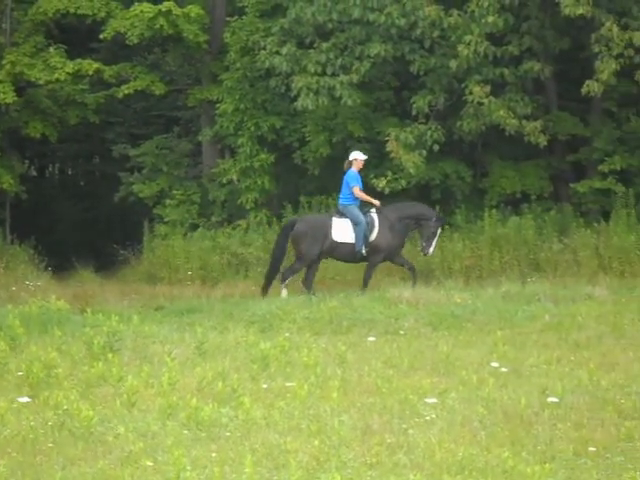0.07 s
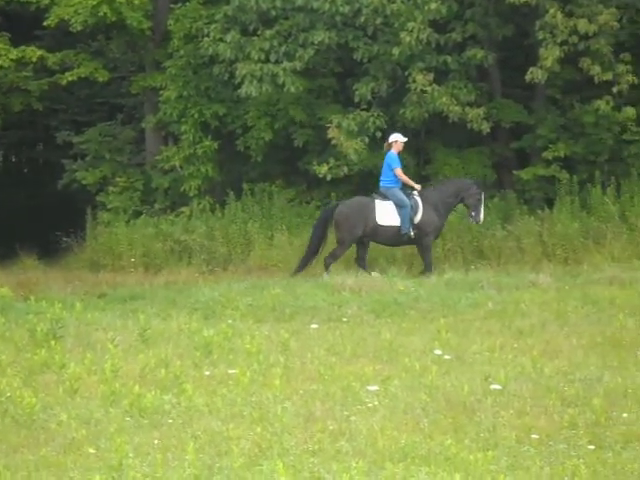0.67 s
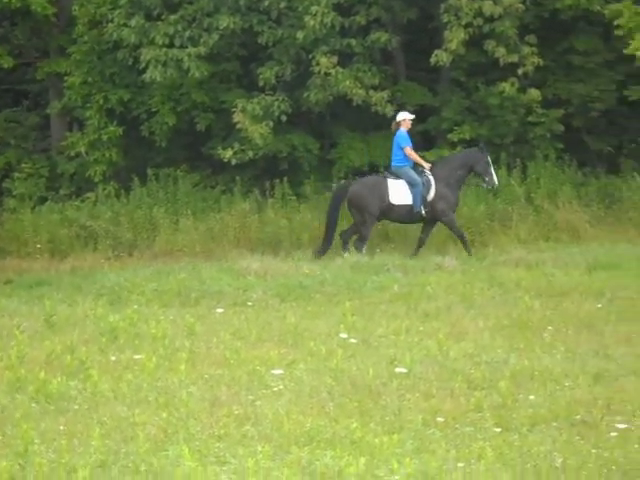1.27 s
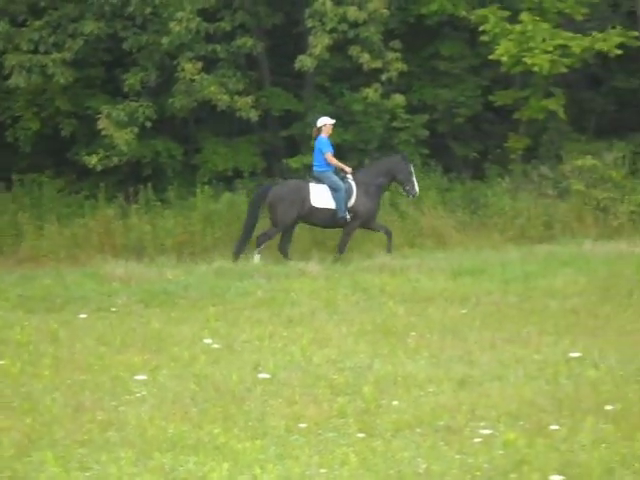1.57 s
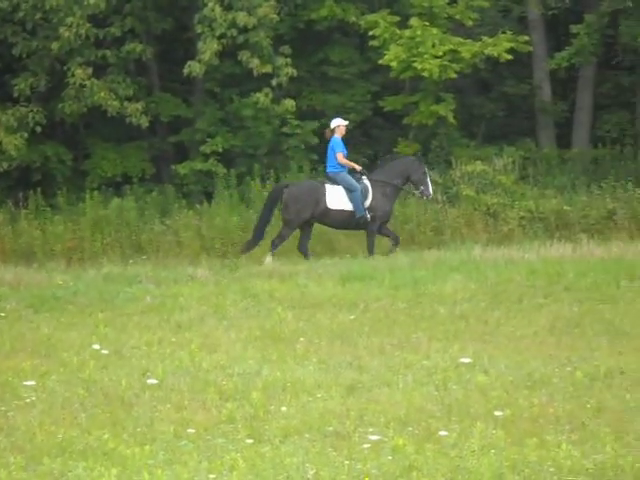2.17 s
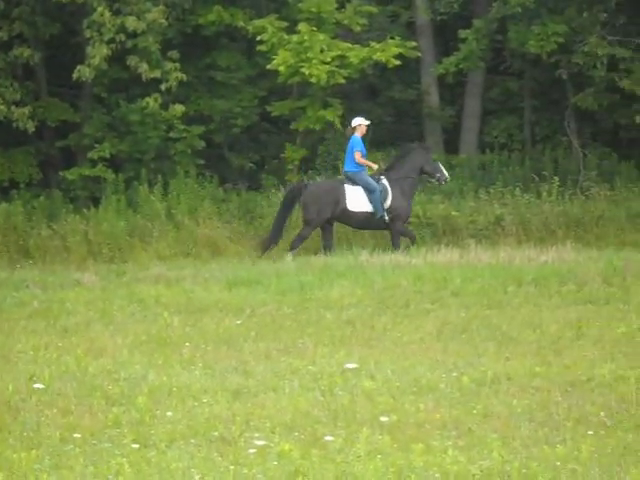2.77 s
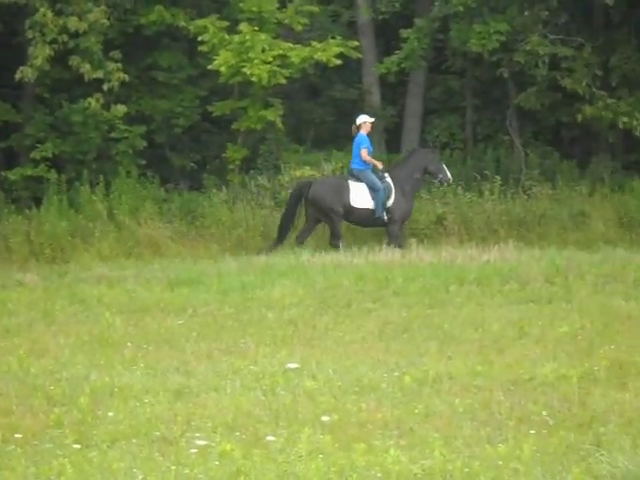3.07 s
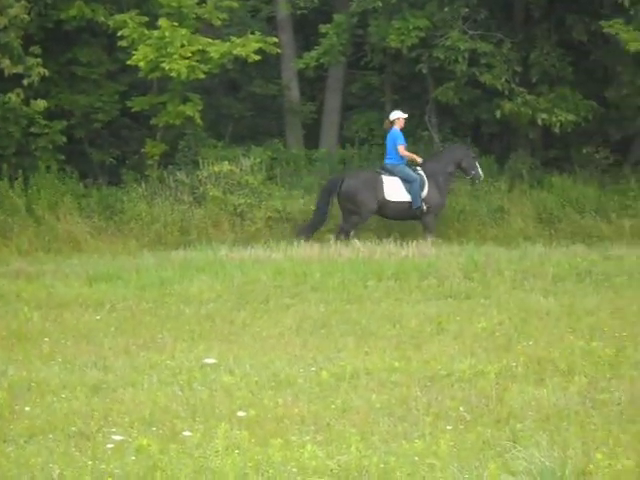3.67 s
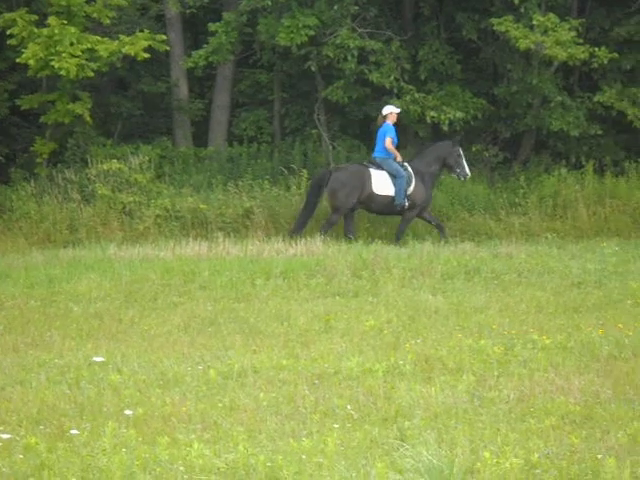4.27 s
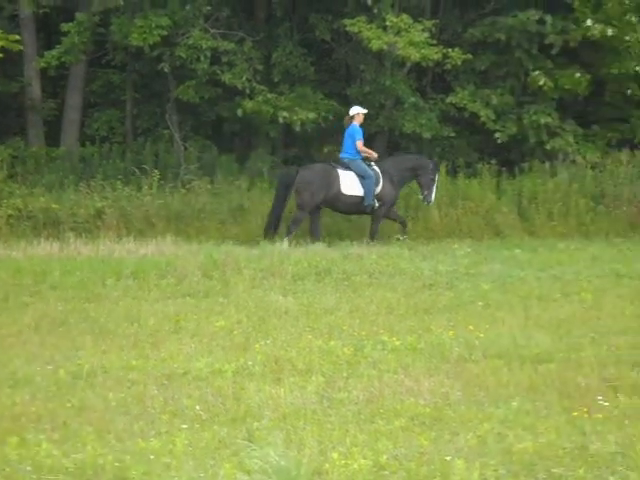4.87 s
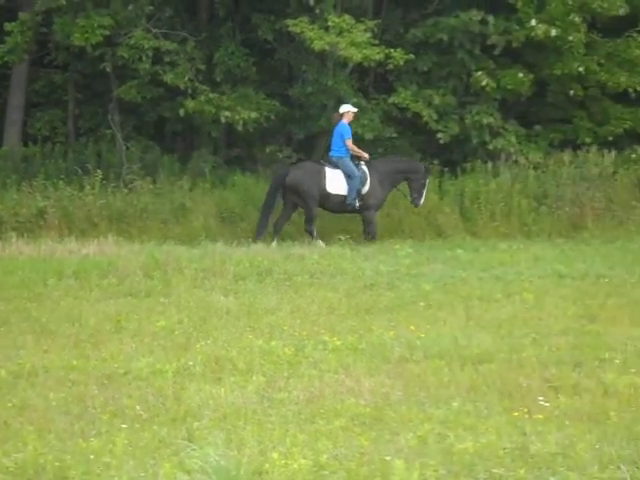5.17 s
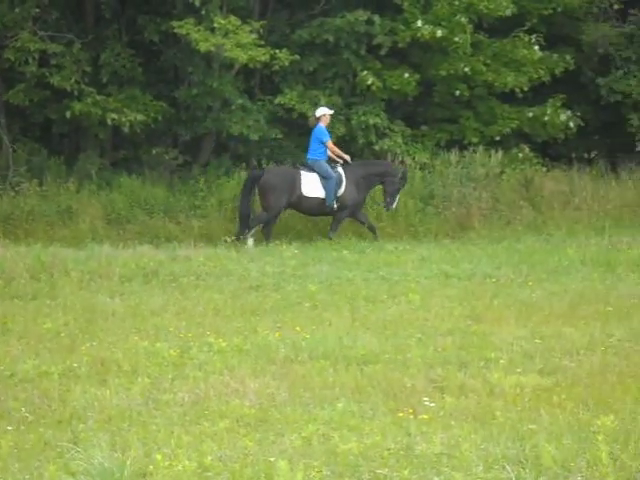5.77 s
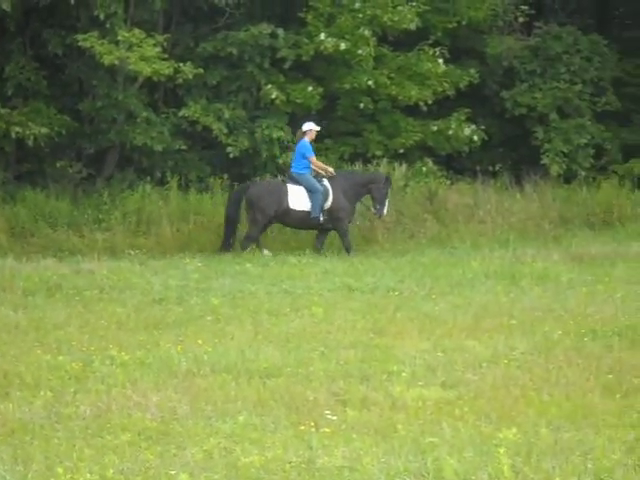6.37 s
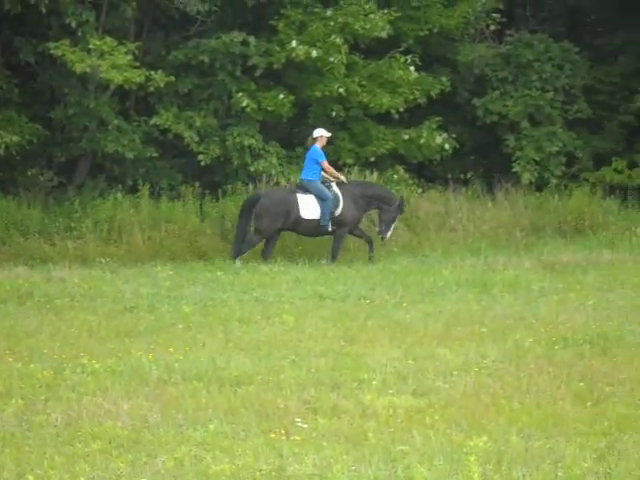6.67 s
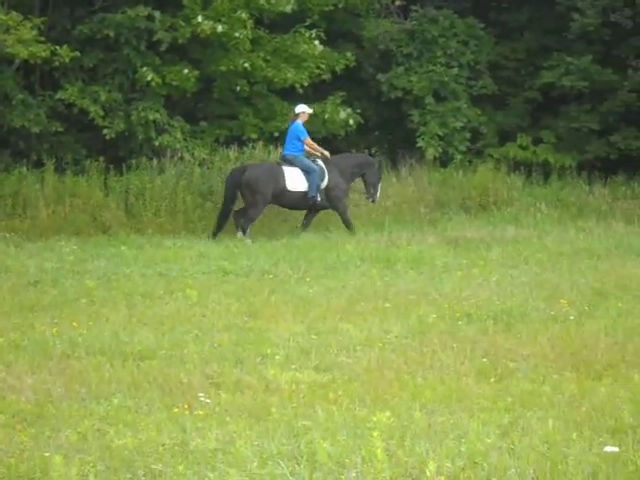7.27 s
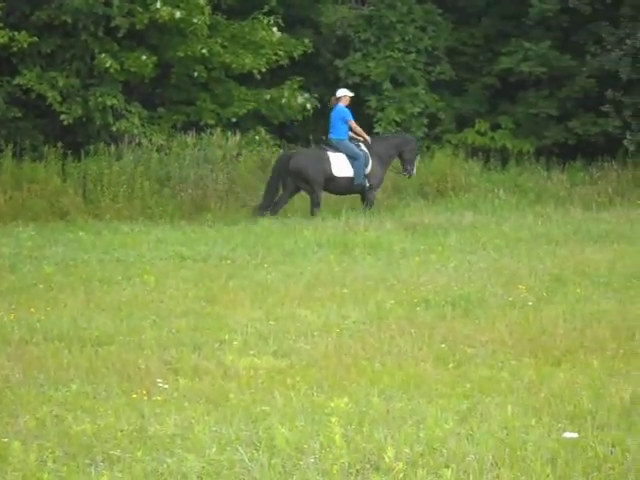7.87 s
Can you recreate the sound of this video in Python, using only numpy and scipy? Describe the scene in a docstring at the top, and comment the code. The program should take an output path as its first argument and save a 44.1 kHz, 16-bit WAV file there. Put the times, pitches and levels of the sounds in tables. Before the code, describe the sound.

A steady, faint hiss runs for the whole eight seconds, a mix of a small camera's microphone noise and the smooth wash of trees around an open field. It barely wavers and sounds dull, with little treble. Under it lies a light, lumpy wind rumble on the microphone, swelling slightly in the first second. At about 1.2 seconds comes one sharp, very short plastic click right at the microphone, by far the loudest sound and slightly distorted. The hiss drops at once, partly recovers within half a second, stays a little lower until about 3.5 seconds, then creeps back by around 6 seconds. The breeze builds gently from about 4.5 seconds. Several soft, low wind buffets bump the microphone between 5.7 and 6.3 seconds, and a quicker cluster follows from 7.6 seconds to the end as the rumble rises.

```python
"""Steady hiss of a small camera's microphone, with the wash of trees, in an open field.
Light wind rumbles on the microphone and buffets it towards the end. One sharp click close by,
likely the camera's plastic case, overloads the recorder: its gain control drops the hiss,
holds it down and slowly lets it return."""
import sys
import numpy as np
from scipy import signal
from scipy.fft import rfft, irfft, next_fast_len
from scipy.io import wavfile
from scipy.ndimage import minimum_filter1d

SR = 44100
rng = np.random.default_rng(int(sys.argv[2]) if len(sys.argv) > 2 else 0)


def wav_out(sig):
    """Save sig, one row per channel (or a flat mono array), as 16-bit PCM at SR to the path in sys.argv[1]."""
    wavfile.write(sys.argv[1], SR, np.round(np.clip(np.atleast_2d(sig).T, -1, 1) * 32767).astype(np.int16))


N = 358091
TIME = np.arange(N) / SR


def hiss(level_db=-38, waver_db=0.39):
    """Microphone hiss and wash of trees: smooth noise that barely wavers."""
    # (frequency [Hz], relative density [dB])
    spectrum = [(20, -2.5), (90, -2), (150, -2), (220, -2), (290, -0.6), (420, -1.3), (600, -0.74),
                (800, 0), (1100, -2.2), (1600, -3.5), (2300, -5), (3200, -6), (4500, -6.5)]
    return from_db(level_db + waver_db * drift(rate_hz=5.5)) * noise(spectrum)


def case_click(onset_s=1.19647, gain_db=1.2, rise_cycles=3.61, tail_db=-25, tail_t60_s=.09):
    """The plastic case rings for a few milliseconds and leaves a faint diffuse tail."""
    # (frequency [Hz], level [dB], t60 [s])
    modes = [(650, 15.5, 0.0058), (1076, -7, .014), (1640, 18, .0025), (1950, -4, .0175),
             (2533, 6.5, .0111), (2671, 5, .0091), (3570, -9, .018), (3813, 2, .008), (4133, -5.5, .017)]
    # (frequency [Hz], relative density [dB])
    tail_spectrum = [(200, -8), (700, -7), (1500, -2.5), (2800, -3.5), (5000, -6), (8000, -41)]
    age_s = np.maximum(TIME - onset_s, 0)
    ring = np.zeros(N)
    for hz, mode_db, t60_s in modes:
        swell = 1 - np.exp(-(hz * age_s / rise_cycles) ** 2)  # high modes speak first
        ring += swell * from_db(mode_db - 60 * age_s / t60_s) * np.sin(2 * np.pi * hz * age_s)
    tail = (age_s > 0) * from_db(tail_db - 60 * age_s / tail_t60_s) * noise(tail_spectrum)
    return from_db(gain_db) * (ring + tail)


def buffets(half_width_cycles=1.08):
    """Each eddy rocks the diaphragm for a few slow cycles; deeper ones last longer."""
    # (time [s], peak level [dB], frequency [Hz])
    eddies = [(5.706, -34, 66), (5.843, -44, 80), (6.037, -30.5, 24), (6.222, -41, 95), (6.272, -39.5, 85),
              (7.599, -41.5, 100), (7.637, -36.5, 80), (7.708, -42, 68), (7.823, -37.5, 68),
              (7.903, -38.5, 85), (7.969, -40, 72)]
    rocking = np.zeros(N)
    for (crest_s, peak_db, hz), phase in zip(eddies, rng.random(len(eddies))):
        cycles = hz * (TIME - crest_s)
        envelope = from_db(peak_db) * np.exp(-(cycles / half_width_cycles) ** 2)
        rocking += envelope * np.cos(2 * np.pi * (cycles + phase))
    return rocking


def wind(breeze_db=-48.5, lumps_db=1.1):
    """Lumpy rumble of a steady breeze on the microphone, lifted by each gust."""
    # (frequency [Hz], relative density [dB])
    spectrum = [(4, -14.5), (12, 0), (28, 0.5), (45, -3.5), (70, -5.5), (100, -15), (150, -29.5),
                (300, -51.5), (1000, -93.5)]
    # (crest time [s], rise [dB], half width [s])
    gusts = [(0.3, 5, 0.15), (1.05, 3, 0.4), (5.45, 4, 1.15), (7.97, 8, 0.48)]
    gust_db = sum(rise_db * np.exp(-((TIME - crest_s) / half_s) ** 2)
                  for crest_s, rise_db, half_s in gusts)
    return from_db(breeze_db + gust_db + lumps_db * drift(rate_hz=12)) * noise(spectrum)


def from_db(db):
    """Decibels to gain."""
    return 10 ** (np.asarray(db) / 20)


def unit_rms(x):
    """Scales to rms 1."""
    return x / np.sqrt(np.mean(x ** 2) + 1e-20)


def colour(x, spectrum):
    """Filters by (frequency [Hz], gain [dB]) points joined on a log-frequency axis."""
    size = next_fast_len(N + 8192)
    hz, db = np.transpose(spectrum)
    bin_hz = np.fft.rfftfreq(size, 1 / SR)
    gain = from_db(np.interp(np.log(bin_hz + 1), np.log(hz + 1), db))
    return irfft(rfft(x, size) * gain, size)[..., :N]


def noise(spectrum):
    """Coloured noise, rms 1."""
    return unit_rms(colour(rng.standard_normal(N), spectrum))


def drift(rate_hz):
    """Slow random wander, rms 1, with rate_hz knots a second."""
    knots = rng.standard_normal(1024)
    return unit_rms(np.interp(TIME * rate_hz, np.arange(len(knots)), knots))


def release(db, tau_s):
    """Follows rises at once, falls back exponentially."""
    fade = np.exp(-TIME / tau_s)
    return np.maximum.accumulate(db / fade) * fade


def gain_control(x, threshold_db=-22, quick_share=.31, slow_share=.24, hold_s=2.38, attack_s=.01):
    """Peaks over the threshold cut the gain: one part recovers quickly, one holds, then creeps back."""
    over_db = np.maximum(20 * np.log10(abs(x).max(0) + 1e-9) - threshold_db, 0)
    half_hold = int(hold_s * SR / 2)
    # highest peak of the last hold_s
    held_db = -minimum_filter1d(-over_db, 2 * half_hold + 1, origin=half_hold, mode="constant")
    cut_db = quick_share * release(over_db, tau_s=.24) + slow_share * release(held_db, tau_s=1.1)
    pole = np.exp(-1 / (attack_s * SR))  # too slow to catch the first cycles
    return x * from_db(-signal.lfilter([1 - pole], [1, -pole], cut_db))


def scene():
    """All sources at one microphone."""
    return (hiss() + wind() + buffets() + case_click())[None]


def record(dry, full_scale=.72, cutoff_hz=16500):
    """Recorder: narrow band, gain control, clipping, low-pass."""
    # (frequency [Hz], gain [dB])
    passband = [(3650, 0), (3800, -2.5), (3910, -10), (4010, -18.5), (4200, -16), (4400, -29), (4600, -55),
                (4800, -100)]
    levelled = gain_control(colour(dry, passband))
    clipped = np.clip(levelled, -full_scale, full_scale)  # only clipping reaches the high treble
    low_pass = signal.firwin(511, cutoff_hz, window=("kaiser", 9), fs=SR)
    return signal.oaconvolve(clipped, low_pass[None], "same")


dry = scene()
out = record(dry)
wav_out(out)
```